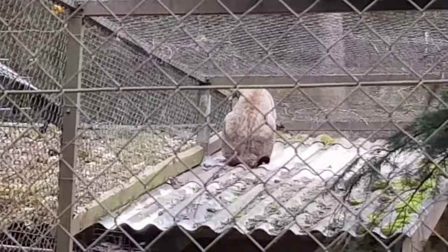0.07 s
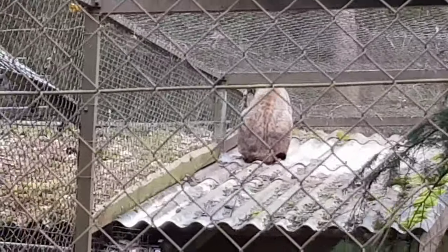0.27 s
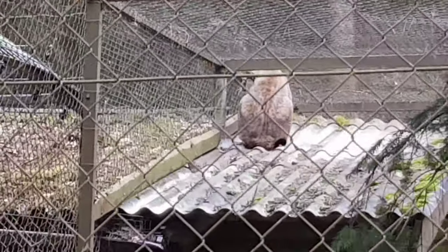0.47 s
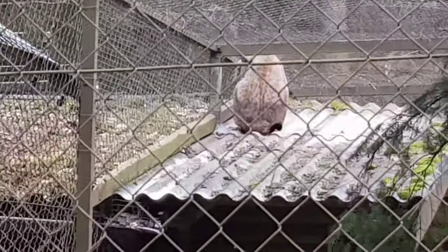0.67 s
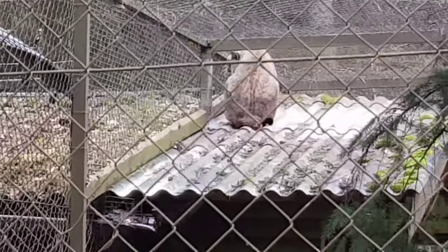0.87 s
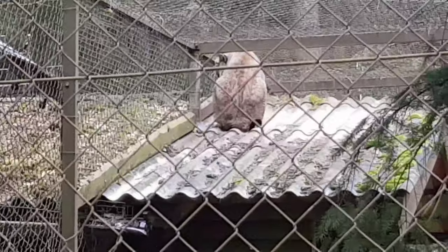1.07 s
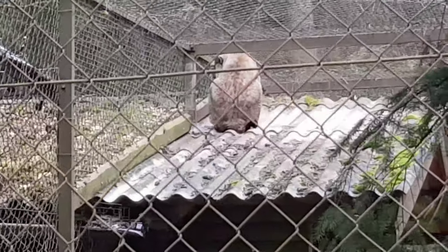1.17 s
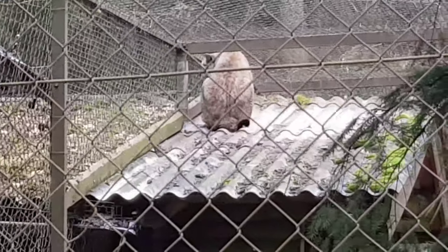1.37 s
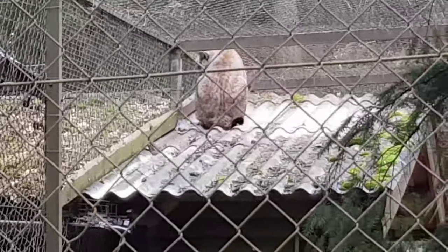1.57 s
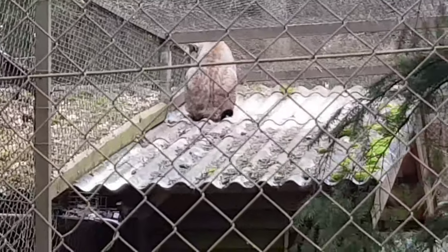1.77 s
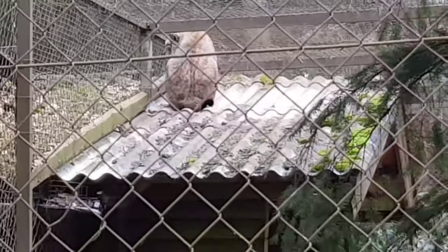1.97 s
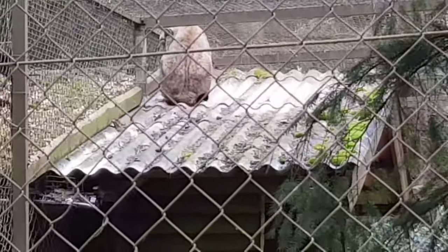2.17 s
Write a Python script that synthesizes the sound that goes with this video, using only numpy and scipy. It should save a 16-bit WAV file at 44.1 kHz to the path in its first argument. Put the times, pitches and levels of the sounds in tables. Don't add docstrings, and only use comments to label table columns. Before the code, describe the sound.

A lynx yowls once from about 0.2 to 1.0 s, leaping to a peak near 0.4, loudest at 0.6, then sagging roughly. A duller, farther cat answers at 0.6-0.95. Echoes linger in yard and woods. Sparrows chirp quickly until 1.75, with thin whistles mostly after 1.5. Faint rumble and hiss; soft bumps at 1.1, 1.25 and 2.04, a sharp tick at 1.77, sleeve rustle strongest around 2.1.

```python
import sys
import numpy as np
from scipy import signal
from scipy.fft import rfft, irfft
from scipy.io import wavfile
from scipy.ndimage import uniform_filter1d

SR = 44100
rng = np.random.default_rng(int(sys.argv[2]) if len(sys.argv) > 2 else 0)


def magnitude_from_level(level_db):
    exponent = np.asarray(level_db, float) / 20
    return 10 ** exponent


def wav_out(sig):
    wavfile.write(sys.argv[1], SR, np.round(np.clip(np.atleast_2d(sig).T, -1, 1) * 32767).astype(np.int16))


N = 97020
BIRD_PAN_DB = -1.8


def curve(rows, col):
    rows = np.array(rows)
    return np.interp(np.arange(N) / SR, rows[:, 0], rows[:, col])


def colour(rows, hz):
    rows = np.array(rows)
    return np.interp(np.log(hz), np.log(rows[:, 0]), rows[:, 1])


def unit(x):
    return x / np.sqrt(np.mean(x ** 2))


def walk(rate_hz):
    hold = max(int(SR / rate_hz), 1)
    steps = np.repeat(rng.standard_normal(N // hold + 1), hold)
    slewed = uniform_filter1d(uniform_filter1d(steps, hold), hold)
    return unit(slewed[:N])


def band(x, hz, width_hz):
    return signal.lfilter(*signal.iirpeak(min(hz, .45 * SR), hz / width_hz, SR), x)


def noise_band(hz, width_hz):
    return unit(band(band(rng.standard_normal(N), hz, width_hz), hz, width_hz))


def pan(x, db):
    return x * magnitude_from_level(np.array([[db], [-db]]) / 2)


def air():
    # hz, density_db
    spectrum = [(25, -9), (65, 6), (180, -14.5), (380, -21.5), (1000, -15), (3000, -17.5), (5600, -42.5),
                (15500, -34.5)]
    level_db, wide, wide_bass, wide_hz = -56, 0.47, 0.051, 2500
    f = np.maximum(np.fft.rfftfreq(N, 1 / SR), 10)
    shape = magnitude_from_level(colour(spectrum, f))
    side_gain = wide_bass + wide * f / (f + wide_hz)
    mid = irfft(rfft(rng.standard_normal(N)) * shape, N)
    side = irfft(rfft(rng.standard_normal(N)) * shape * side_gain, N)
    hush = mid + side * np.array([[1], [-1]])
    return hush / mid.std() * magnitude_from_level(level_db + 1.0 * walk(7.66))


def far_flock():
    # hz, width_hz, level_db
    twitter = [(2200, 600, -71), (4300, 800, -68), (6200, 1100, -69)]
    # time_s, level_db
    leaving = [
        (0, 0),
        (1.3, 0),
        (1.45, -5),
        (2.2, -8),
    ]
    swell_db = 1.5
    flock = sum(noise_band(hz, w) * magnitude_from_level(db + swell_db * walk(8.6)) for hz, w, db in twitter)
    return pan(flock * magnitude_from_level(curve(leaving, 1)), BIRD_PAN_DB)


def sparrows():
    # arch_top_s, top_pitch_hz, level_db, fall_s
    chirps = [(.042, 2250, -52, .032), (.165, 2230, -54, .028), (.293, 2150, -53, .024),
              (.37, 2270, -55, .016), (.42, 2110, -52, .024), (.483, 2200, -54, .014),
              (.563, 2110, -53, .016), (.59, 2400, -51, .014), (.682, 2200, -49, .02),
              (.762, 2200, -55, .016), (.8, 2200, -48, .024), (.922, 2280, -50, .024),
              (1.047, 2200, -50, .026), (1.152, 2200, -56, .014), (1.192, 2100, -53, .02),
              (1.272, 2320, -54, .014), (1.312, 2100, -51, .022), (1.39, 2230, -57, .016),
              (1.507, 2300, -56, .016), (1.578, 2050, -62, .016), (1.625, 2260, -55, .016),
              (1.74, 2200, -58, .018)]
    # late_s, level_db
    slaps = [
        (0, 0),
        (.015, -6),
        (.027, -11),
    ]
    partials_db = (-8, 0, -3)
    rise_s, sag, late_bird_s, late_bird_low_db = 0.0099, .35, 1.35, 0
    flutter_db, rough, low_hz = 2, .5, 2050
    beak_hz, beak_width_hz, beak_db = 3300, 900, -1
    out = np.zeros(N + SR)
    for top_s, top_hz, db, fall_s in chirps:
        u = np.arange(-rise_s, fall_s, 1 / SR)
        u = np.where(u < 0, u / rise_s, u / fall_s)
        phase = 2 * np.pi * np.cumsum(top_hz * (1 - sag * u ** 2)) / SR
        tone = sum(magnitude_from_level(p) * np.sin((k + 1) * phase) for k, p in enumerate(partials_db))
        if top_s > late_bird_s:
            tone = tone + magnitude_from_level(late_bird_low_db) * np.sin(phase) * (1 - u ** 2) ** 2
        for late_s, slap_db in slaps:
            i = int((top_s - rise_s + late_s) * SR)
            out[i:i + len(u)] += tone * np.sqrt(1 - u ** 8) * magnitude_from_level(db + slap_db)
    out = out[:N] * magnitude_from_level(flutter_db * walk(150)) * (1 + rough * walk(900))
    out = out + magnitude_from_level(beak_db) * band(out, beak_hz, beak_width_hz)
    return signal.sosfilt(signal.butter(4, low_hz, "high", fs=SR, output="sos"), out)


def cat(rows, throat, mouth, press_db):
    folds_db = (-2, 1, -2, -2, -36)
    # hz, width_hz, level_db
    breath = [(634, 430, -25.5), (2500, 1360, -19)]
    jitter, shimmer_db, rough, gate_s = .003, 2.2, .085, .015
    t = np.arange(N) / SR
    hz = uniform_filter1d(curve(rows, 1), size=1800) * (1 + jitter * walk(58.44))
    phase = 2 * np.pi * np.cumsum(hz) / SR
    gains = []
    for k, db in enumerate(folds_db):
        throat_db = colour(throat, (k + 1) * hz / mouth)
        gains.append(magnitude_from_level(db + k * press_db + throat_db + shimmer_db * walk(39.45)))
    voice = 0
    for n, gain in enumerate(gains, 1):
        voice = voice + gain * (1 + rough * n * walk(300)) * np.sin(n * phase)
    voice = voice / np.sqrt(sum(g ** 2 for g in gains) / 2)
    rasp = sum(magnitude_from_level(db) * noise_band(f, w) for f, w, db in breath) * (1 + np.cos(phase))
    gate = np.clip(np.minimum(t - rows[0][0], rows[-1][0] - t) / gate_s, 0, 1)
    return (voice + rasp * magnitude_from_level(press_db)) * magnitude_from_level(curve(rows, 2)) * gate


def lynx():
    # time_s, pitch_hz, level_db, mouth_opening (1 = rest), press_db per partial
    yowl = [
        (.17, 270, -60, 0.27, 0.5),
        (.264, 494.4, -39.5, 0.96, -3),
        (.342, 632.3, -35, 1, -6.5),
        (.422, 650.7, -34, 0.69, -2),
        (.6, 567, -31, 0.97, 0),
        (.745, 477.3, -33, 0.78, 0.5),
        (.898, 430.9, -37, 0.84, 1.5),
        (.985, 389.5, -38, 0.83, 6.5),
        (1.028, 339, -41, 0.83, -1),
    ]
    # hz, level_db
    throat = [(280, -30.5), (480, -1.5), (700, -14.5), (1150, -1.5), (1500, -3), (2000, -7), (2600, -6),
              (3200, -14)]
    return cat(yowl, throat, curve(yowl, 3), curve(yowl, 4))


def whistlers():
    # start_s, length_s, from_hz, to_hz, level_db
    glides = [(0.444, 0.042, 6000, 5580, -60), (.515, 0.058, 3650, 3500, -66),
              (1.486, 0.032, 4063, 3960, -57), (1.592, 0.069, 4510, 4400, -57.5),
              (1.683, 0.11, 4410, 4380, -69.5), (1.853, 0.097, 3770, 4085, -50.5),
              (1.935, .11, 3950, 3880, -64), (1.875, .155, 4780, 5850, -72), (1.915, .065, 3160, 3120, -62),
              (1.98, 0.062, 3100, 3200, -73), (1.986, .009, 5000, 4400, -54),
              (1.993, .082, 4370, 4310, -55), (2.09, .109, 4330, 4350, -64),
              (1.585, 0.0131, 4750, 4650, -63.5)]
    flutter_db = 2.2
    out = np.zeros(N + SR)
    for start_s, length_s, from_hz, to_hz, db in glides:
        u = np.arange(0, 1, 1 / (length_s * SR))
        phase = 2 * np.pi * np.cumsum(from_hz + (to_hz - from_hz) * u) / SR
        i = int(start_s * SR)
        out[i:i + len(u)] += np.sin(phase) * np.sin(np.pi * u) ** .4 * magnitude_from_level(db)
    return np.sqrt(2) * out[:N] * magnitude_from_level(flutter_db * walk(70))


def answering_cat():
    # time_s, pitch_hz, level_db, press_db per partial
    answer = [
        (.6, 419.3, -63, -10),
        (.63, 469, -46.5, -1),
        (.68, 489.6, -44.5, -17),
        (.75, 471, -35.5, 2),
        (.82, 392.6, -42, 0),
        (.88, 335.3, -46, -4),
        (.94, 308, -55, -7),
        (.97, 289.7, -70, -2),
    ]
    # hz, level_db
    throat = [(280, -3), (500, 0), (900, -3), (1400, -18), (2200, -28), (3200, -45)]
    return cat(answer, throat, 1, curve(answer, 3))


def sleeve():
    # time_s, level_db, cloth_body_db
    rub_course = [
        (0, -113.5, -3),
        (.55, -101, -38.5),
        (.75, -73.5, -18),
        (1.0, -90, 7),
        (1.76, -83.5, -7),
        (1.81, -62.5, -43),
        (2.0, -65, -30),
        (2.04, -59, -2.5),
        (2.11, -51.5, -6.5),
        (2.2, -67, 3),
    ]
    # hz, width_hz, level_db
    cloth = [(2280, 210, -2), (2700, 620, 2), (3500, 2500, 1), (7600, 2600, -1), (13260, 4700, -5.5)]
    pan_db = -1.2
    parts = []
    for hz, width_hz, db in cloth:
        mid_side = rng.standard_normal((2, N)) * [[1], [.3]]
        parts.append(magnitude_from_level(db) * unit(band(mid_side, hz, width_hz)) * magnitude_from_level(1.8 * walk(60)))
    rub = sum(parts[:-1]) * magnitude_from_level(curve(rub_course, 2)) + parts[-1]
    mid, side = rub * magnitude_from_level(curve(rub_course, 1) + 1.2 * walk(45))
    return pan(mid, pan_db) + side * np.array([[1], [-1]])


def bumps():
    # time_s, hz, peak_db
    knocks = [
        (1.11, 169.7, -51),
        (1.251, 280, -51.5),
        (2.044, 292, -47.5),
    ]
    length_s = .004
    t = np.arange(N) / SR
    out = np.zeros(N)
    for s, hz, db in knocks:
        out += magnitude_from_level(db) * np.exp(-((t - s) / length_s) ** 2) * np.sin(2 * np.pi * hz * (t - s))
    return out


def tick():
    # hz, peak_db, t60_s
    modes = [(6800, -31.5, .003), (4200, -39, .002), (2100, -45, .006), (10500, -40, .001)]
    start_s, pan_db = 1.77112, 2.05
    late_s = np.maximum(np.arange(N) / SR - start_s, 0)
    out = np.zeros(N)
    for hz, db, t60_s in modes:
        out += magnitude_from_level(db) * np.exp(-np.log(1000) * late_s / t60_s) * np.sin(2 * np.pi * hz * late_s)
    return pan(out, pan_db)


def scatter(x, t60_s, build_s):
    wide = .45
    t = np.arange(SR) / SR
    envelope = np.exp(-np.log(1000) * t / t60_s) * np.minimum(t / build_s, 1)
    tail = rng.standard_normal((2, SR)) * envelope
    tail = tail / np.sqrt(np.sum(tail[0] ** 2))
    mid, side = signal.fftconvolve(x[None], tail, axes=1)[:, :N]
    return mid + wide * side * np.array([[1], [-1]])


def scene():
    cat_pan_db, bright_hz = .3, 420
    cats = lynx() + answering_cat()
    birds = sparrows() + whistlers()
    bright = signal.lfilter(*signal.butter(1, bright_hz, "high", fs=SR), cats)
    yard = scatter(bright * magnitude_from_level(-11) + birds * magnitude_from_level(-7), t60_s=0.21, build_s=0.0013)
    woods = scatter(bright * magnitude_from_level(-10) + birds * magnitude_from_level(-15), t60_s=1.41, build_s=0.014)
    direct = pan(cats, cat_pan_db) + pan(birds, BIRD_PAN_DB)
    return direct + yard + woods + air() + far_flock() + sleeve() + bumps() + tick()


def roll_off(x):
    return signal.sosfilt(signal.butter(12, 16460, fs=SR, output="sos"), x)


def record(dry):
    top_hz = 15750
    mix = signal.sosfilt(signal.ellip(8, .2, 70, top_hz, fs=SR, output="sos"), dry)
    return roll_off(mix)


dry = scene()
out = record(dry)
wav_out(out)
```